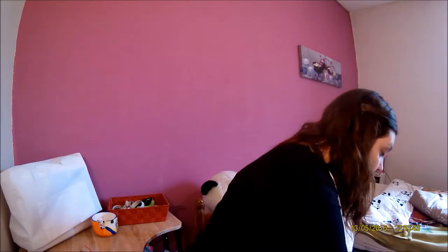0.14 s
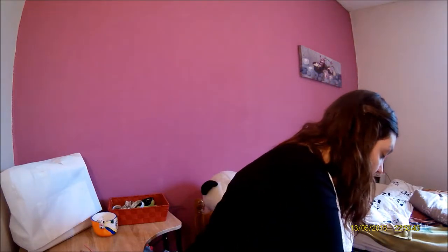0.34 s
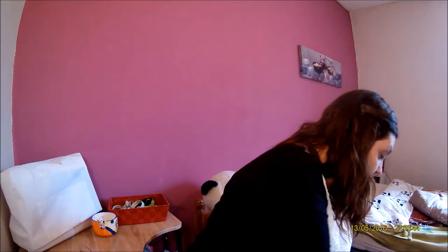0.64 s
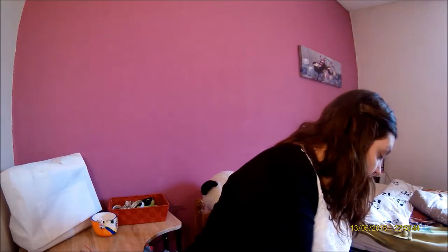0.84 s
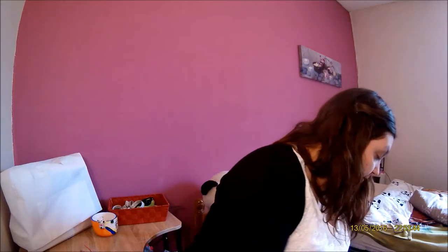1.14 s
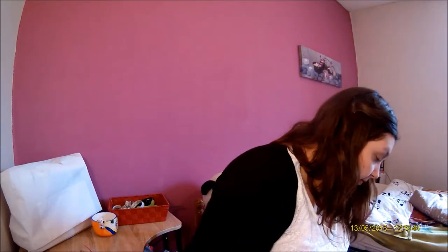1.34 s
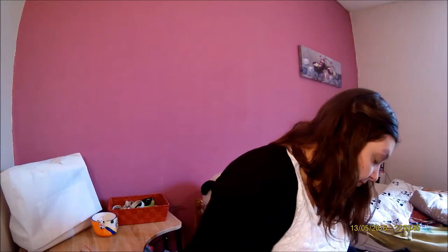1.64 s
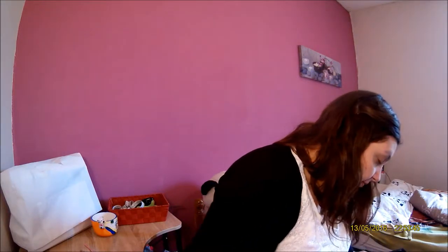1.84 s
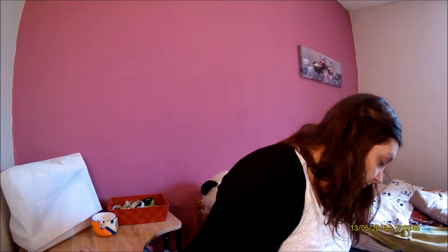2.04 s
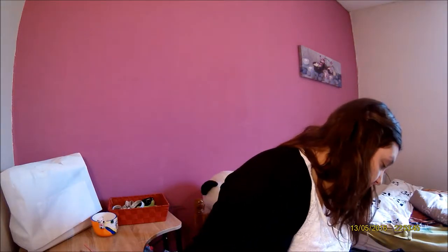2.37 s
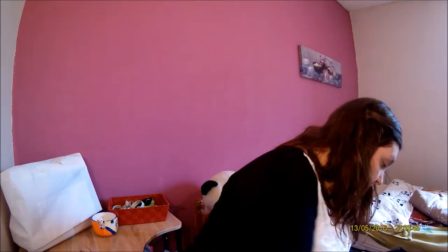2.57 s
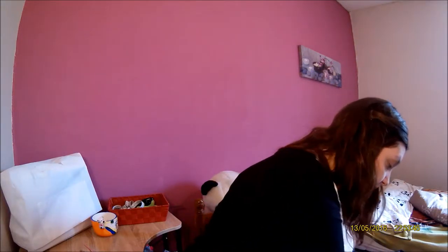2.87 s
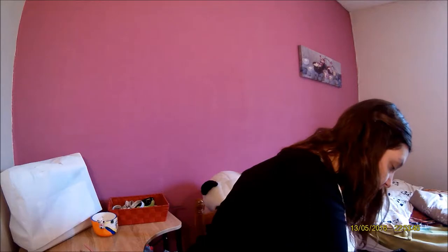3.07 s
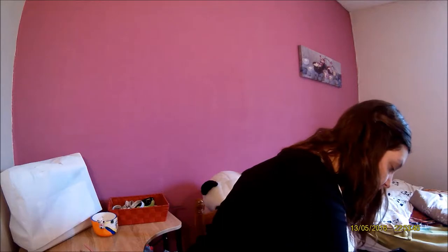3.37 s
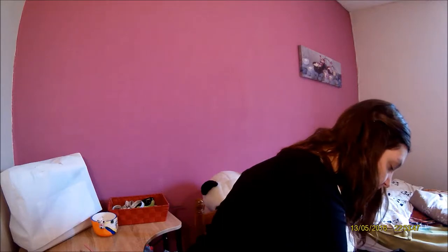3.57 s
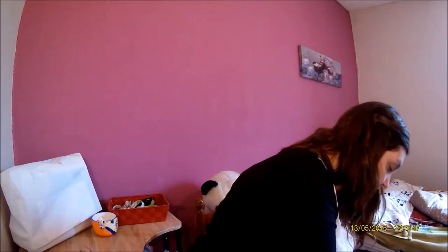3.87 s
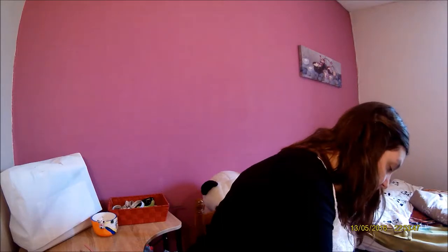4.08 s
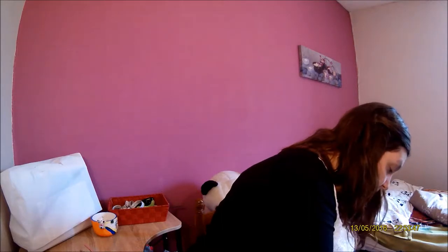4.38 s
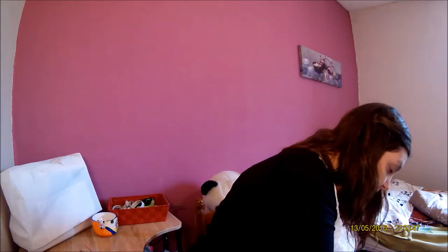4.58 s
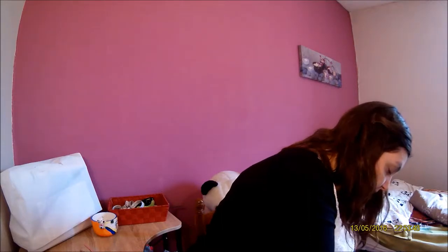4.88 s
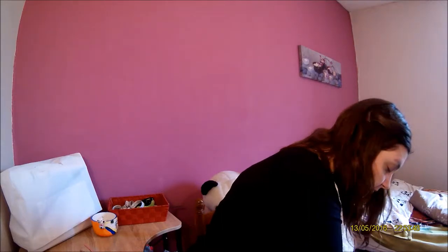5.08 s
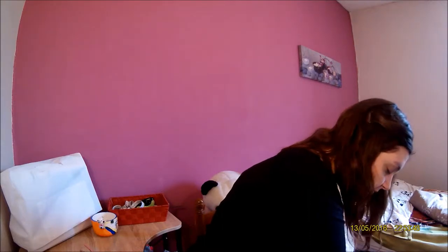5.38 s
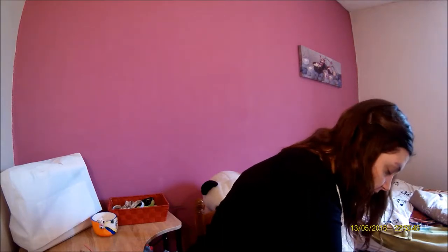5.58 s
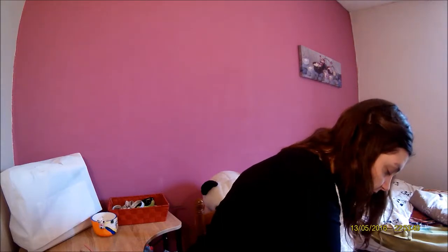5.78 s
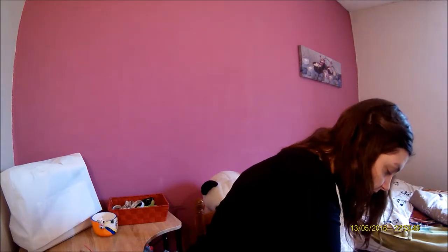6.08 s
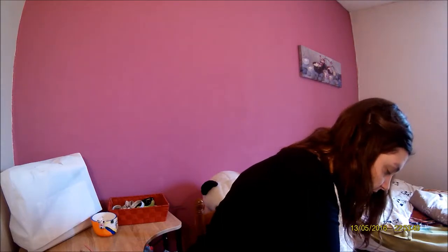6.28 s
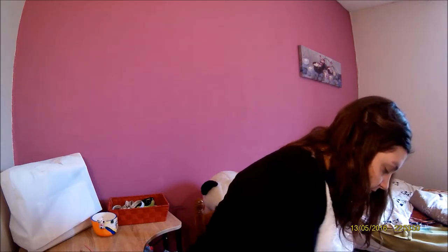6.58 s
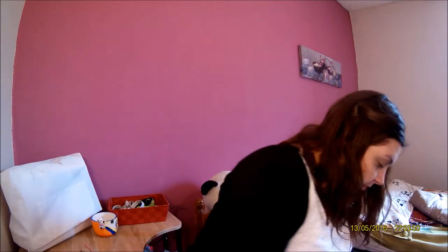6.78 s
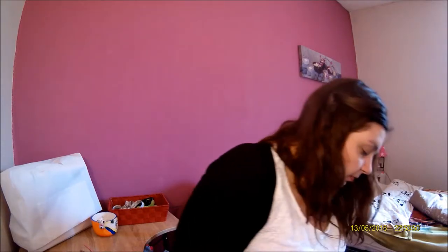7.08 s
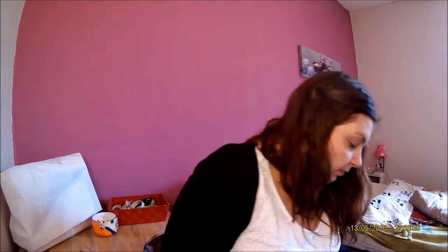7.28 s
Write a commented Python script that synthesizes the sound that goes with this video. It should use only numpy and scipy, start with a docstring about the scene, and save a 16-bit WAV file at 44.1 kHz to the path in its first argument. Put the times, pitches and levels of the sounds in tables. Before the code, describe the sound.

Flat plastic cases are rummaged through in a small bedroom. A quick cluster of hollow clacks and shuffling opens, then only faint touches remain. Knocks return after about three seconds, growing denser around five, followed by softer shoves and a sharp last clack. The microphone is a metre or two away, slightly muffled, with short room reflections and low background rumble.

```python
"""Flat plastic cases are rummaged through on the floor of a small bedroom, a metre or two below the microphone.
Knocks and shoves are short contacts, and sliding is a stream of tiny clicks; both set the tones of the cases
and the floor ringing. The walls answer with a few dull echoes and a fading tail.
Room tone, made of filtered noise, and a thin electronic whine lie under it all."""
import sys
import numpy as np
from scipy import signal
from scipy.io import wavfile

SR = 44100
rng = np.random.default_rng(int(sys.argv[2]) if len(sys.argv) > 2 else 0)


def store_wav(level_fs):
    """Save 16-bit WAV to argv[1]."""
    pcm = np.round(np.clip(np.atleast_2d(level_fs), -1, 1) * 32767)
    wavfile.write(sys.argv[1], SR, pcm.T.astype(np.int16))


N = 327295   # length in samples


def amp(db):
    """Turn decibels into a gain."""
    return 10 ** (np.asarray(db) / 20)


def rms_one(x):
    """Scale to an rms of 1."""
    return x / np.sqrt(np.mean(x ** 2) + 1e-20)


def at_hz(points, hz):
    """Read a value between the rows of a (Hz, value) table, on a log-frequency axis."""
    table_hz, values = np.array(points).T
    return np.interp(np.log(hz), np.log(table_hz), values)


def drift(rate_hz):
    """Slow random wander with a spread of 1: noise smoothed twice by a one-pole low-pass."""
    step = 40   # one noise value every 40 samples, joined by straight lines
    pole = np.exp(-2 * np.pi * rate_hz * step / SR)
    noise = rng.standard_normal(N // step + 2002)
    slow = signal.lfilter([1], [1, -2 * pole, pole * pole], noise)[2000:]   # drop the start-up
    return np.interp(np.arange(N) / step, np.arange(len(slow)), rms_one(slow))


def bandpass(x, low_hz, high_hz):
    """Keep what lies between two frequencies."""
    return signal.sosfilt(signal.butter(2, [low_hz, high_hz], "band", fs=SR, output="sos"), x)


def bands(white):
    """Cut half-octave bands from two noises in turn, so that neighbours differ: (centre Hz, band)."""
    lows = 7 * 2 ** np.arange(0, 11.5, .5)
    highs = np.append(lows[1:], .45 * SR)
    for k, (low, high) in enumerate(zip(lows, highs)):
        yield np.sqrt(low * high), bandpass(white[k % 2], low, high)


# Knocks of case on case, before each part's own response.
# Each row: start in seconds, levels of hollow box, lid, edge, clasp tick and floor thud in dB,
# favoured pitch of the box in Hz, favoured pitch of the lid or edge in Hz.
KNOCK_EVENTS = [(0.023, -34.5, -33.5, -45, -59, -57, 455, 1050),
                (0.112, -44, -31, -41, -58, -75, 441, 1050), (0.141, -55, -46, -47, -78, -67, 549, 1000),
                (0.19, -35, -41, -53, -71, -61, 541, 961), (0.217, -23.5, -28.5, -31, -51, -58, 450, 1080),
                (0.372, -18.5, -25.5, -35.5, -51.5, -54, 426.4, 1210),
                (0.414, -42, -34, -39, -53, -51, 415, 1140),
                (0.749, -64, -70, -52.5, -68, -73, 291.4, 1770),
                (1.024, -54.5, -60, -81, -82, -61, 540, 880), (1.172, -50, -55, -66, -85, -61, 608, 807),
                (1.35, -46.5, -57, -75, -71, -63, 301, 856), (2.169, -68, -50.5, -50, -71, -63, 283, 1280),
                (2.345, -64, -48.5, -54.5, -60.5, -61.5, 318, 1450),
                (2.585, -64, -43.5, -47, -53, -77, 556, 1330),
                (2.714, -47.5, -47.5, -55, -72, -58, 530, 800),
                (2.774, -56, -49.5, -57.5, -58, -59, 544, 1210), (2.828, -37, -53, -62, -66, -44, 440, 789),
                (3.076, -28.5, -36, -45, -64.5, -47, 556, 835),
                (3.244, -40.5, -43.5, -61, -76, -56.5, 560, 826),
                (3.382, -46, -52, -63, -73, -69, 445.6, 1190),
                (3.468, -46.5, -43.5, -57, -69, -60, 530, 830),
                (3.991, -38, -37.5, -61, -82, -62, 540, 1160), (4.022, -30.5, -39, -66, -78, -53, 600, 834),
                (4.825, -32.5, -42.5, -70, -73, -54, 640, 850),
                (4.997, -30.5, -31, -39.5, -51, -45, 470, 1120),
                (5.23, -38, -33.5, -43, -48, -69, 565, 1210), (5.249, -32.5, -31, -43, -65, -46, 650, 980),
                (5.287, -23, -21, -31.5, -46.5, -33, 447, 990),
                (5.305, -49, -29, -42.5, -60, -49, 681, 790), (5.56, -47, -49, -69, -76, -72, 526, 1130),
                (5.779, -48.5, -60, -77, -70, -48.5, 423, 851),
                (5.966, -33, -46, -68, -73, -49.5, 673, 721),
                (5.98, -48, -36.5, -45, -58, -45.5, 688, 1190), (6.074, -50, -55, -58, -68, -53, 556, 721),
                (6.087, -41.5, -38, -47.5, -71, -67, 545, 1020),
                (6.111, -45, -44, -51, -67, -65, 559, 1030), (6.138, -56, -54, -54, -61, -56, 624, 969),
                (6.243, -40, -50, -45.5, -63, -60, 310, 754),
                (6.697, -39.5, -48.5, -43, -73, -57, 475, 1540),
                (6.904, -51, -55, -61, -79, -51.5, 540, 791), (7.198, -33, -44, -50, -60, -57, 400, 950),
                (7.219, -40, -49, -45.5, -65, -60, 444, 743), (7.244, -48, -49, -44, -62, -61, 536, 1140),
                (7.355, -44, -52, -44.5, -73, -46, 452, 1840),
                (7.397, -21, -28.5, -40, -55, -42, 433, 1290)]
# Shoves, where a case is pushed against the pile in a run of soft touches.
# Each row: start in seconds, levels of hollow box, lid, edge and floor thud in dB,
# favoured pitch of the box in Hz, favoured pitch of the lid or edge in Hz.
SHOVE_EVENTS = [(0.062, -53, -46, -66, -62, 549, 910), (0.092, -41, -57, -67, -61, 630, 1020),
                (0.825, -52, -76, -78, -58.5, 549, 1050), (0.957, -58, -54, -74, -50.5, 280, 1050),
                (2.097, -41.5, -66, -75, -50, 646, 733), (3.711, -37, -50.5, -76, -52.5, 454.7, 981),
                (3.754, -36, -55, -68, -70, 619, 807), (3.982, -36, -34.5, -67, -50, 452, 1146),
                (4.183, -47, -49.5, -73, -59, 510, 870), (4.226, -45.5, -59, -82, -70, 611, 850),
                (4.779, -33, -45, -62, -53.5, 446, 1038), (4.848, -36, -50, -61, -49, 610, 853),
                (5.07, -33.5, -34, -42.5, -46.5, 538.7, 1390), (5.328, -52, -47, -45, -50, 522, 875),
                (6.197, -36, -51, -68, -57, 540, 799), (6.258, -49, -56, -66, -53.5, 630, 915),
                (6.357, -44, -52, -72, -61, 343.7, 1090), (6.419, -46, -52, -63, -57, 420, 1040),
                (6.544, -45, -44, -63, -63, 575.3, 872), (6.559, -44, -44.5, -76, -62, 616, 860),
                (7.07, -37.5, -66, -58.5, -60, 429.4, 864), (7.138, -38.5, -43, -57, -60, 479, 939),
                (7.168, -36, -58, -58, -52, 440, 756)]
# Usual pitch when the other of the two stands out. Two values: lid in Hz, edge in Hz.
USUAL_PITCH = [1140, 1955]
EDGE_FROM_HZ = 1500      # a lid-or-edge pitch above this belongs to the edge
SHOVE_CLASP_DB = -78     # a shove barely stirs the clasps
KNOCK_MS, SHOVE_MS = 5.2, 30   # how long the contact lasts
LATER_TOUCH, SHOVE_TOUCH = 0.14, 0.32   # largest size of a knock's later touches, of a shove's touches
KNOCK_DIRECT_DB, SHOVE_DIRECT_DB = 5, 11   # extra level straight to the microphone
BOOM_DB, HEAVY_DB = -61, -54.5   # room boom under light thuds; a thud above HEAVY_DB raises it
BOOM_FOLLOWS = 0.71      # dB of boom per dB of thud above HEAVY_DB


def blows(touches):
    """A knock is one firm touch with faint ones after it; a shove is a run of soft touches."""
    shoves = np.insert(np.array(SHOVE_EVENTS, float), 4, SHOVE_CLASP_DB, axis=1)
    events = np.vstack([KNOCK_EVENTS, shoves])
    start_s, box_db, lid_db, edge_db, clasp_db, thud_db, box_hz, upper_hz = events.T
    boom_db = BOOM_DB + BOOM_FOLLOWS * np.maximum(thud_db - HEAVY_DB, 0)

    edge_stands_out = upper_hz > EDGE_FROM_HZ
    lid_hz = np.where(edge_stands_out, USUAL_PITCH[0], upper_hz)
    edge_hz = np.where(edge_stands_out, upper_hz, USUAL_PITCH[1])

    is_knock = (np.arange(len(events)) < len(KNOCK_EVENTS))[:, None]
    chance = rng.random((len(events), 2, touches))
    later = np.arange(touches).clip(max=1)   # 0 for the first touch, 1 for the rest
    contact_s = np.where(is_knock, KNOCK_MS, SHOVE_MS) / 1000
    touch_s = start_s[:, None] + later * chance[:, 0] * contact_s
    at = np.round(touch_s * SR).astype(int).clip(max=N - 1)

    push = 2 * chance[:, 1] - 1   # either direction
    knock_size = np.where(later, LATER_TOUCH * push, 1)
    shove_size = SHOVE_TOUCH * np.where(later, push, 1)
    size = np.where(is_knock, knock_size, shove_size)
    direct_gain = amp(np.where(is_knock, KNOCK_DIRECT_DB, SHOVE_DIRECT_DB))
    parts_db = [box_db, lid_db, edge_db, clasp_db, thud_db, boom_db]
    return parts_db, [box_hz, lid_hz, edge_hz], at, size, direct_gain


SLIPS_PER_S, SLIP_SPREAD_DB = 440, 1.5   # average rate; how uneven the click sizes are


def slips():
    """Cases sliding on each other catch and let go in many small uneven clicks; rms 1."""
    sizes = amp(SLIP_SPREAD_DB * np.minimum(rng.exponential(1, N), 4))
    sizes = sizes * rng.choice([-1, 1], N)
    return rms_one(sizes * (rng.random(N) < SLIPS_PER_S / SR))


# Hands shifting the pile. Each row: time in seconds, strength of the shuffle in dB, before each part's response.
SHUFFLE_STRENGTH = [(0.0, -40.5), (0.31, -46.5), (0.58, -60.5), (1.82, -65), (2.54, -64.5), (2.99, -56.5),
                    (3.8, -65), (4.11, -58), (4.56, -65.5), (4.83, -60.5), (4.94, -52), (5.21, -54.5),
                    (5.74, -62), (6.01, -61), (6.14, -54), (6.94, -59.5), (7.27, -46.5), (7.42, -67)]
# How readily the parts take up the sliding. One value in dB for each of
# box, lid, edge, clasp, floor and room boom.
SLIDE_RESPONSE = [-14, -14, -32, -28, -13.5, -3.5]
# How much of the shuffle's rise and fall reaches the parts. One share, without unit, for each of
# box, lid, edge, clasp, floor and room boom.
SLIDE_SHARE = [0.92, 1.035, 0.41, 0.27, 0.054, 0.18]
SHUFFLE_MIDDLE_DB = -58   # the shuffle swings about this
SLIP_CLUMP_DB = 5         # slips come in swells, several a second


def sliding_gains():
    """The drive of the sliding on each part rises and falls with the hands and swells by chance."""
    start_s, shuffle_db = np.transpose(SHUFFLE_STRENGTH)
    swing_db = np.interp(np.arange(N) / SR, start_s, shuffle_db) - SHUFFLE_MIDDLE_DB
    base_db = SHUFFLE_MIDDLE_DB + SLIP_CLUMP_DB * drift(7.8)
    return [amp(base_db + response_db + share * swing_db)
            for response_db, share in zip(SLIDE_RESPONSE, SLIDE_SHARE)]


def ring(clicks, hz, t60):
    """A unit click sets a sine of height 1 ringing, which falls by 60 dB in t60 seconds."""
    decay = amp(-60 / (t60 * SR))   # per sample
    turn = 2 * np.pi * hz / SR
    feedback = [1, -2 * decay * np.cos(turn), decay * decay]
    return signal.lfilter([0, np.sin(turn)], feedback, clicks + 1e-18)


# The tones (modes) that ring, in six groups: box, lid, edge, clasp, floor and room boom.
# Each row of a group: pitch in Hz, level in dB, time to fall by 60 dB in seconds.
PART_MODES = [
    [(236, -3.5, 0.041), (308.4, -4.5, 0.027), (388, -4.5, 0.041), (442, -4, 0.038), (573, 3, 0.016),
     (635, -2, 0.017)],
    [(806.4, -1.5, 0.013), (873, -3, 0.019), (1001, -1, 0.0084), (1135, -2.5, 0.012), (1290, -7.5, 0.018),
     (1452, -8, 0.016)],
    [(1535, 0, 0.0076), (1780, -4, 0.02), (1996, 3.5, 0.0093), (2062, 3.5, 0.0088), (2500, 3.5, 0.0091),
     (2485, 8, 0.0056), (2714, 8, 0.0025)],
    [(3720, -2.5, .006), (4360, 2, 0.0039), (4580, 0, 0.0051), (5480, -1.5, 0.002), (6740, -4, 0.0025),
     (8700, -1, 0.00045)],
    [(92.5, -13, 0.033), (120.7, -4, 0.18), (149, -9.5, 0.13), (192.1, -3, 0.13)],
    [(52.9, 3.5, 0.57), (61.67, -6.5, 0.36)],
]
# How readily the parts take up a blow. One value in dB for each of box, lid, edge, clasp, floor and room boom.
BLOW_RESPONSE = [0, 8.5, 4.5, 12, -2, -5.5]
STRIKE_SPREAD_DB = 2.5   # each blow lands a little elsewhere
FOCUS_DB = 17            # loss of a mode one octave from the pitch that a blow favours


def cases():
    """Blows and slips make the modes ring: two signals, straight to the microphone and sent to the walls."""
    parts_db, favoured_hz, at, size, direct_gain = blows(touches=10)
    strike_luck = rng.standard_normal((len(at), sum(map(len, PART_MODES))))
    gains = sliding_gains()
    out, mode = np.zeros((2, N)), 0
    for part, modes in enumerate(PART_MODES):
        sound = 0
        for hz, level_db, t60 in modes:
            # a steady drive builds up over the ring time, so divide that out
            build_up = np.sqrt(t60 * SR / np.log(1000))
            sliding = amp(level_db) * gains[part] * slips() / build_up

            blow_db = parts_db[part] + BLOW_RESPONSE[part] + level_db
            blow_db = blow_db + STRIKE_SPREAD_DB * strike_luck[:, mode]
            if part < 3:   # box, lid and edge: each blow brings out the modes near its favoured pitch
                blow_db -= FOCUS_DB * np.abs(np.log2(hz / favoured_hz[part]))
            strength = size * amp(blow_db)[:, None] * (-1) ** mode   # modes alternate in sign

            clicks = np.array([sliding, sliding])
            np.add.at(clicks[0], at, strength * direct_gain)
            np.add.at(clicks[1], at, strength)
            sound = sound + ring(clicks, hz, t60)
            mode += 1
        # soft plastic contact: little energy far outside the modes
        out += bandpass(sound, .8 * modes[0][0], 1.3 * modes[-1][0])
    return out


# Echoes from the nearest walls. Each row: delay in seconds, level in dB.
WALL_ECHOES = [(0.0114, 2), (0.02, 0.5), (0.035, -14.5), (0.043, -9.5), (0.054, -29)]
# How long the room rings. Each row: frequency in Hz, time to fall by 60 dB in seconds.
ROOM_DECAY = [(100, 0.2), (400, 0.29), (1000, 0.46), (2500, 0.42), (5000, 0.25), (10000, 0.13)]
ROOM_DB, ROOM_RISE_S = -0.5, 0.0073   # level of the tail, time it takes to swell
ECHO_WIDTH_S = 0.00021   # soft furnishings dull each echo


def bedroom(x):
    """A few dull wall echoes, and a diffuse tail of noise that swells and dies band by band."""
    t = np.arange(SR * 3 // 4) / SR
    tail = 0
    for hz, band in bands(rng.standard_normal((2, len(t)))):
        tail = tail + band * amp(-60 * t / at_hz(ROOM_DECAY, hz))
    tail = tail * (1 - np.exp(-(t / ROOM_RISE_S) ** 2))
    response = amp(ROOM_DB) * tail / np.sqrt(np.sum(tail ** 2))
    for delay_s, level_db in WALL_ECHOES:
        bump = np.exp(-((t - delay_s) / ECHO_WIDTH_S) ** 2)
        response += amp(level_db) * bump / np.sum(bump)
    return signal.fftconvolve(x, response)[:N]


# Colour of the room tone and hiss. Each row: frequency in Hz, relative level in dB per Hz.
TONE_COLOUR = [(8, 4), (33, 4), (42, -1), (55, 1), (80, -6), (120, -5), (200, -8), (400, -14), (690, -17),
               (880, -12), (1250, -16), (1700, -25), (2600, -29), (5000, -31.5), (15600, -33)]
# Thin electronic whine. Each row: pitch in Hz, rms level in dB.
WHINE_TONES = [(11563, -101)]
TONE_DB, TONE_FLICKER_DB = -57.5, 1.5   # rms level of the whole tone, spread of its wavering


def room_tone():
    """Rumble and murmur of the house waver slowly; the electronics' hiss above is steadier, with a whine."""
    tone = 0
    for hz, band in bands(rng.standard_normal((2, N))):
        waver_db = TONE_FLICKER_DB * min(1, 1500 / hz) * drift(2.5)
        tone = tone + amp(at_hz(TONE_COLOUR, hz) + waver_db) * band
    whine = 0
    for hz, level_db in WHINE_TONES:
        whine = whine + amp(level_db) * np.sqrt(2) * np.sin(2 * np.pi * hz * np.arange(N) / SR)
    return amp(TONE_DB) * rms_one(tone) + whine


SHADOW_HZ = 2170   # the body between pile and microphone dulls the direct path above this


def scene():
    """The pile heard directly and through the room, over the room tone."""
    direct, sent = cases()
    direct = signal.sosfilt(signal.butter(1, SHADOW_HZ, fs=SR, output="sos"), direct)
    return (direct + bedroom(sent) + room_tone())[None]


CUTOFF_HZ = 15708


def record(dry):
    """A steep low-pass cuts off the top of the treble."""
    return signal.sosfilt(signal.ellip(14, .5, 75, CUTOFF_HZ, fs=SR, output="sos"), dry)


dry = scene()
out = record(dry)
store_wav(out)
```